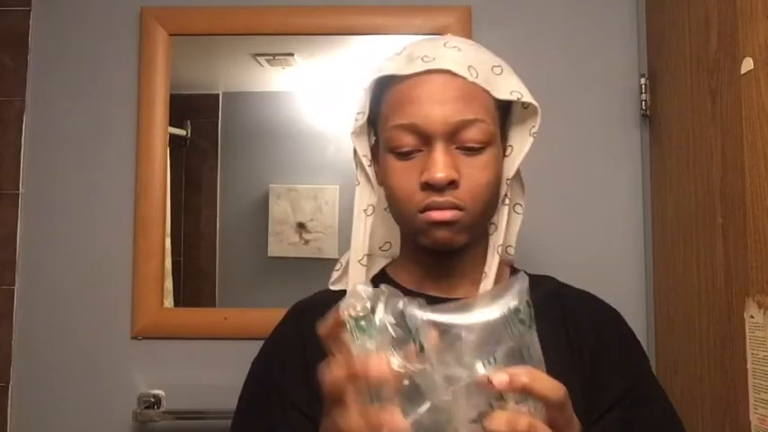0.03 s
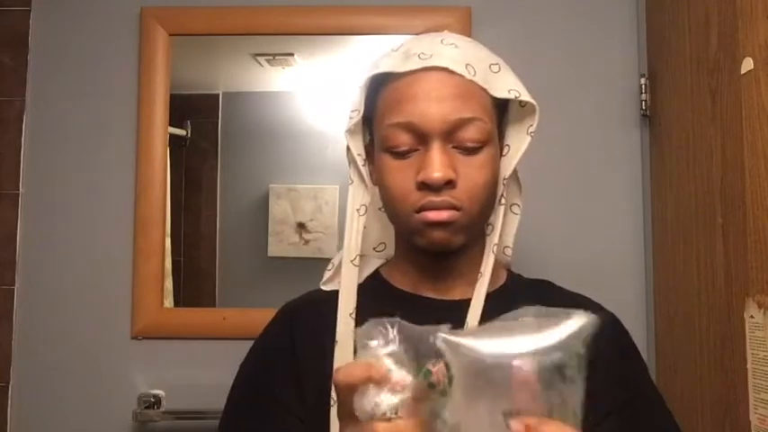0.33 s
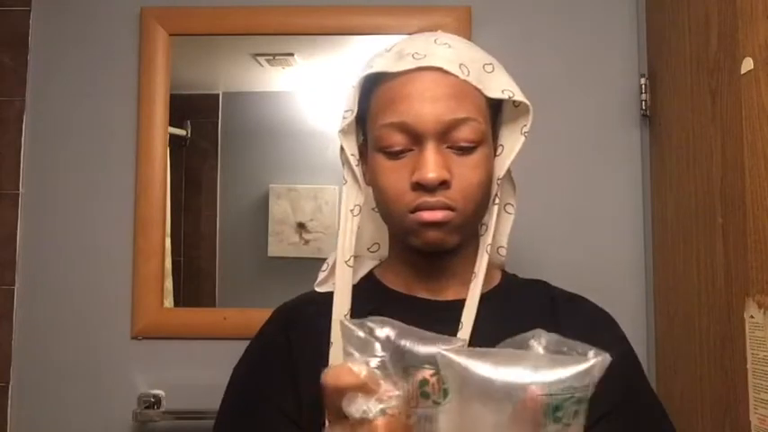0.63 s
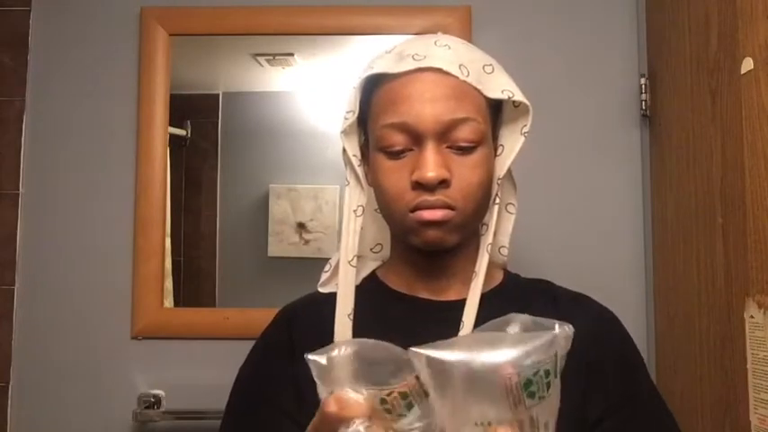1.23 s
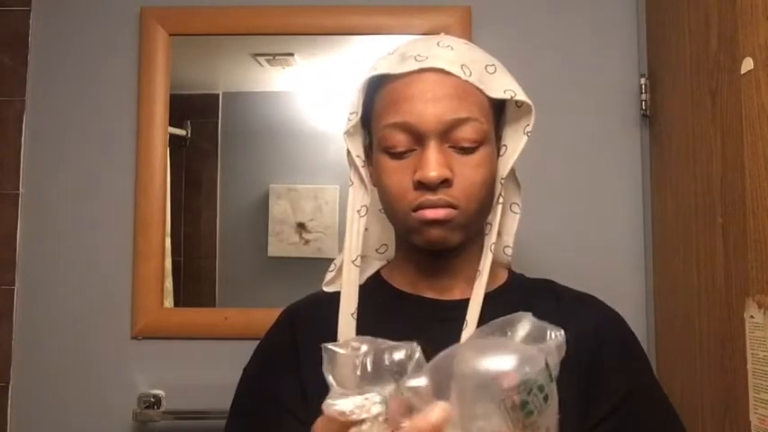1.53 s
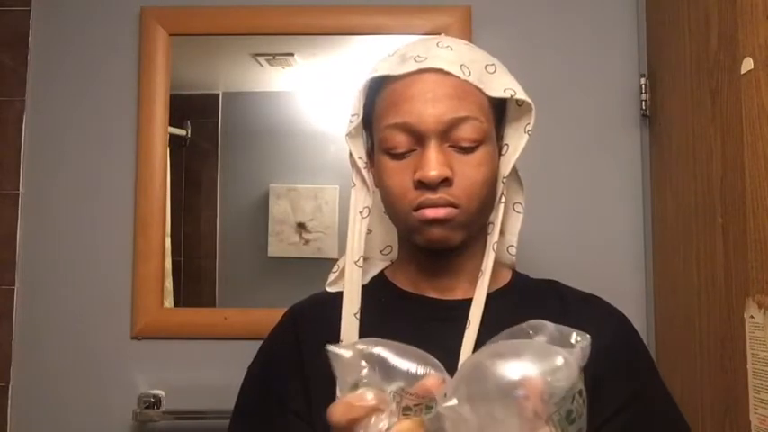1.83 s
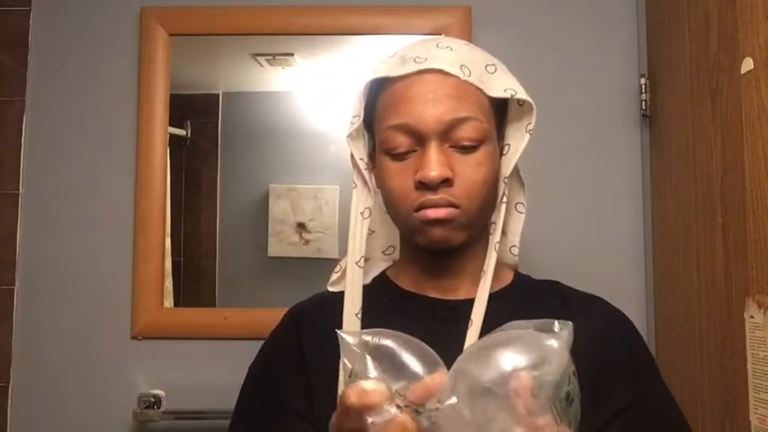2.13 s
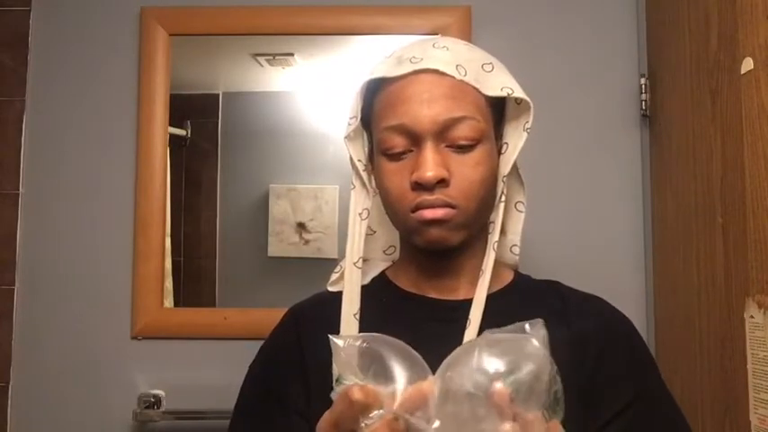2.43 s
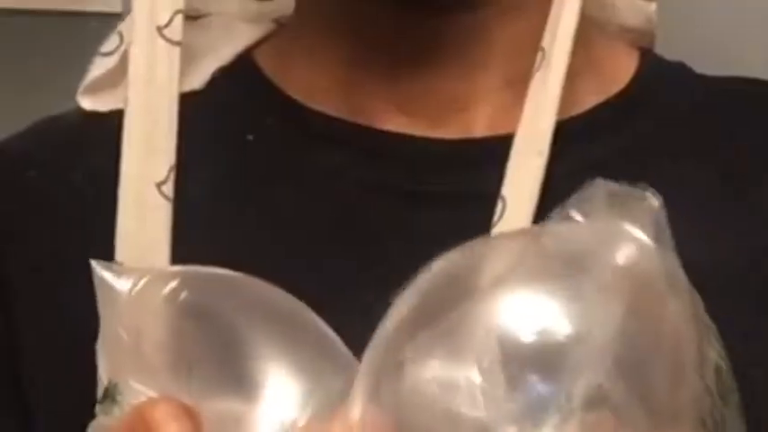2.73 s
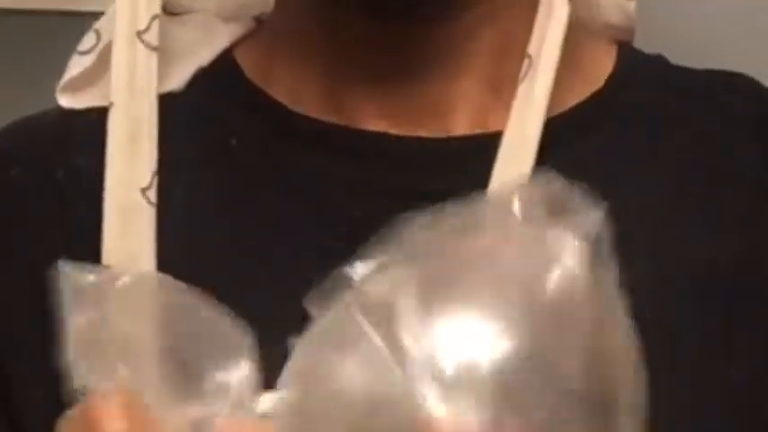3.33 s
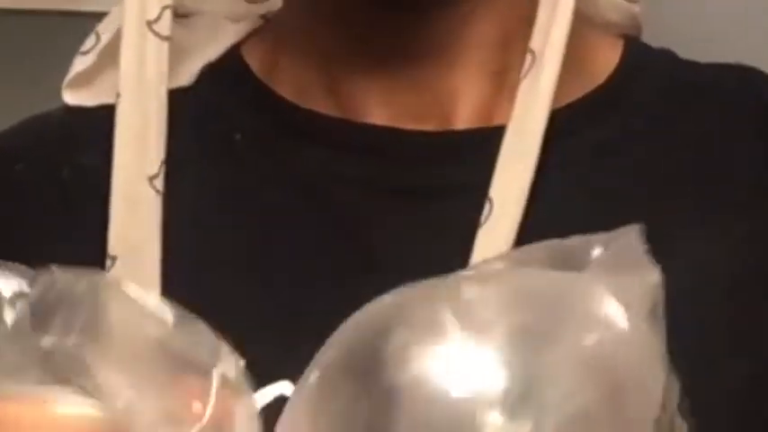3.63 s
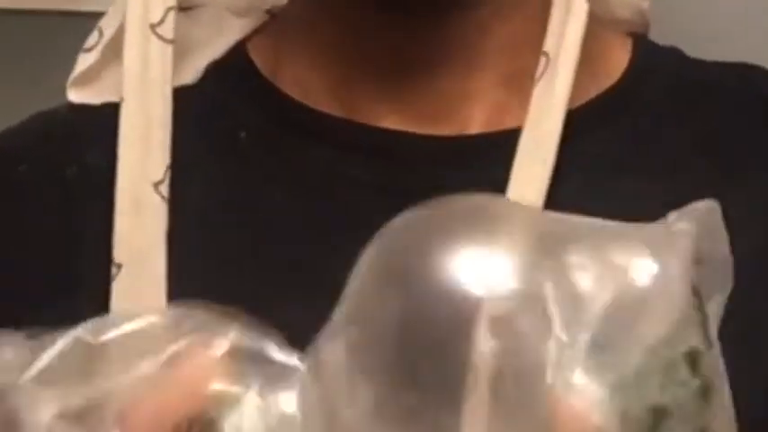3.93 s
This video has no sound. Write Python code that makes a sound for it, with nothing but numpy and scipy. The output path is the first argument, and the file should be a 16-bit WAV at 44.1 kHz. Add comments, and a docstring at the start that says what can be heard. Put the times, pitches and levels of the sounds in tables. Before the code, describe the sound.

Close up in a small, hard-walled bathroom, squeezed plastic air pillows rustle and give three hollow snaps. The crinkling softens, one pillow pops sharply and loudly, and a little light rustling follows.

```python
"""Air pillows in a bathroom

One microphone, close to two hands squeezing plastic air pillows in a small, hard-walled bathroom.
The film crinkles and creases; three times a taut wall buckles with a hollow snap. Then one pillow
tears and bursts, driving the recorder into its limiter, and the slack film rustles on."""
import sys
import numpy as np
from scipy import signal
from scipy.fft import rfft, irfft
from scipy.io import wavfile
from scipy.ndimage import uniform_filter1d, minimum_filter1d

SR = 44100
rng = np.random.default_rng(int(sys.argv[2]) if len(sys.argv) > 2 else 0)


def generate_wav(signal):
    """Clip the signal to [-1, 1] and save it as 16-bit WAV at the path in sys.argv[1]."""
    frames = np.transpose(np.atleast_2d(signal))
    scaled = np.clip(frames, -1, 1) * 32767
    pcm = np.round(scaled).astype(np.int16)
    wavfile.write(sys.argv[1], SR, pcm)


N = 176400

# Room tone at the microphone. Each row: frequency in Hz, relative level in dB.
ROOM_TONE_SPECTRUM = [(20, -8.5), (50, -11.5), (85, 2), (105, -4.5), (145, 0.5), (190, -33.5), (235, -7),
                      (400, -24.5), (1000, -18), (3000, -22), (8000, -30.5), (16000, -35.5)]
# Reverberation of the bathroom. Each row: frequency in Hz, seconds to fall 60 dB.
BATHROOM_T60 = [(100, 0.28), (300, 0.32), (700, 0.23), (1200, 0.2), (2500, 0.16), (6000, 0.18),
                (14000, 0.12)]
# Low room modes, rung by the burst. Each row: frequency in Hz, level in dB, seconds to fall 60 dB.
BATHROOM_MODES = [(86, -44, .7), (149.8, -38, .4), (240.4, -34.5, 0.64), (270.3, -29, 0.55)]
# The hands squeezing. Each row: time in seconds, relative levels of rustle and of crackle in dB.
SQUEEZE_LEVELS = [(0, -43.5, -46.5), (.06, -50.5, -51), (.115, -40.5, -41.5), (.16, -49.5, -53.5),
                  (.22, -34, -43.5), (.29, -37.5, -40), (.33, -37.5, -43.5), (.37, -49, -50.5),
                  (.52, -47.5, -50), (.62, -50.5, -51.5), (.70, -48, -52), (.77, -63, -56.5),
                  (.80, -47, -48), (.85, -54.5, -59.5), (.9, -49.5, -53), (.94, -46.5, -46.5),
                  (1.05, -47, -49.5), (1.24, -43, -47.5), (1.32, -36.5, -49), (1.39, -41, -45),
                  (1.44, -48.5, -54.5), (1.505, -55, -57), (1.539, -34.5, -37.5), (1.58, -38.5, -43.5),
                  (1.61, -44, -47), (1.675, -34.5, -40.5), (1.73, -33, -50), (1.80, -53, -52.5),
                  (1.88, -58, -60.5), (1.93, -54.5, -55.5), (2.0, -47, -48.5), (2.07, -52.5, -54),
                  (2.2, -54, -55.5), (2.3, -50, -52.5), (2.43, -55, -56), (2.52, -50.5, -52),
                  (2.56, -48.5, -56), (2.61, -51, -58), (2.64, -49, -51.5), (2.71, -53, -58.5),
                  (2.77, -55.5, -60.5), (2.87, -61, -63), (2.97, -59.5, -63.5), (3.05, -51.5, -56),
                  (3.12, -60, -67), (3.16, -52, -56.5), (3.25, -70.5, -78), (3.45, -66.5, -73.5),
                  (3.53, -51.5, -56), (3.58, -58, -57), (3.62, -53, -55.5), (3.659, -64, -63),
                  (3.75, -59.5, -64), (3.84, -57, -50), (3.92, -58, -57), (4, -57, -65)]
# Hollow rustle of the pillow. Each row: frequency in Hz, relative level in dB.
RUSTLE_SPECTRUM = [(100, -21.5), (200, -13), (300, -13), (550, -11), (820, -8.5), (1010, 2.5), (1250, -4),
                   (1700, -4), (2450, -7), (2650, -25), (5000, -34), (16000, -61)]
# Fine crackle of the film. Each row: frequency in Hz, relative level in dB.
CRACKLE_SPECTRUM = [(300, -39), (1000, -6), (2900, -6), (3300, 2.5), (4700, -1.5), (5700, -0.5),
                    (7500, -5.5), (9700, -9), (10300, -14.5), (11500, -11.5), (15800, -14)]
# Creases giving way. Each row: start in seconds, relative levels of rustle and of crackle in dB.
CREASE_EVENTS = [(.121, -39, -40.5), (.188, -29, -38), (0.2129, -25, -38), (.275, -26, -46),
                 (0.29, -41, -42), (.391, -29.5, -50), (0.5469, -25.5, -41.5), (.684, -31, -44),
                 (0.729, -35, -40), (.783, -42, -44), (0.8055, -28.5, -33.5), (.911, -27, -42),
                 (1.279, -29.5, -34), (1.314, -33, -42), (1.3431, -18.5, -44), (1.455, -32, -50),
                 (1.51, -34, -41.5), (1.54, -29, -37), (1.664, -24, -47), (1.904, -31.5, -50),
                 (1.953, -31, -38.5), (1.995, -39, -44), (2.043, -35.5, -48.5), (2.106, -33.5, -50),
                 (2.338, -35, -47), (2.536, -28, -37), (2.634, -42, -41.5), (2.752, -30.5, -43.5),
                 (2.822, -32.5, -54), (2.924, -41, -49.5), (3.01, -35.5, -45), (3.512, -28.5, -45)]
# Taut walls buckling, two rows to a snap. Each row: start in seconds, ring gain in dB, pitch in Hz,
# rise in seconds, click gain in dB, thud gain in dB.
BUCKLE_EVENTS = [(0.2421, -19.5, 1047, 0.0007, -13, -50), (0.2445, -9, 1030, 0.00029, -7, -31.5),
                 (1.3292, -20.5, 1116, 0.00042, -27, -61), (1.3397, -13.5, 1034, .0005, -12, -36.5),
                 (1.6795, -9.5, 1163, 0.0015, -33, -59.5), (1.6879, 5.5, 1035, 0.00033, 5.5, -31.5)]
# Ring of a taut pillow. Each row: ratio to its pitch, relative level in dB, seconds to fall 60 dB.
PILLOW_MODES = [(.66, -16, 0.041), (.97, -2.5, 0.031), (1.11, -7.5, 0.036), (1.27, -11, 0.026),
                (1.55, -16, 0.032), (2.2, -15, 0.019)]
# A tear running along the film. Each row: frequency in Hz, relative level in dB.
TEAR_SPECTRUM = [(100, -40), (500, -19.5), (1100, -1), (1800, 5), (2700, -1.5), (4000, -5.5), (5500, -30.5),
                 (9000, -46), (15000, -60.5)]
# The torn film cracking. Each row: start in seconds, gain in dB.
FILM_CRACKS = [(3.1971, -4), (3.2044, 8)]
# The air escaping at once. Each row: frequency in Hz, relative level in dB.
BLAST_SPECTRUM = [(30, -13), (120, -4.5), (195, -17.5), (270, 1), (370, 0.5), (560, -3), (800, -1),
                  (1100, 6), (1500, 1.5), (1900, -5), (2400, -5.5), (2900, -11), (4000, -11.5), (6500, -19),
                  (9000, -33), (10300, -44), (12000, -29.5), (15800, -41.5)]


def amp(db):
    """Decibels to gain."""
    return 10 ** (np.asarray(db) / 20)


def unit_rms(x):
    """Scales to an rms of one."""
    return x / np.sqrt(np.mean(x ** 2) + 1e-20)


def value_at(table, hz):
    """Reads a table along a log-frequency axis."""
    table_hz, values = np.transpose(table)
    return np.interp(np.log(hz + 1), np.log(table_hz + 1), values)


def add(mix, start_s, sound):
    """Adds a sound into the mix at its start time."""
    part = mix[round(start_s * SR):][:len(sound)]
    part += sound[:len(part)]


def colour(x, spectrum, size=4096):
    """Applies a minimum-phase filter of unit energy with the given spectrum."""
    hz = abs(np.fft.fftfreq(size, 1 / SR))
    log_gain = np.log(amp(value_at(spectrum, hz)))
    response = np.exp(np.conj(signal.hilbert(log_gain)))
    taps = np.fft.ifft(response).real[:size // 2]
    return signal.oaconvolve(x, taps / np.linalg.norm(taps))[:len(x)]


def ring(modes, t, pitch=1):
    """Struck modes: a sum of dying sines."""
    return sum(amp(db - 60 * t / t60) * np.sin(2 * np.pi * f * pitch * t) for f, db, t60 in modes)


def ticks(per_s, spread_db):
    """Random clicks, most small and a few large."""
    sizes = amp(spread_db * np.minimum(rng.exponential(1, N), 5))
    signs = rng.choice([-1., 1.], N)
    return unit_rms(sizes * signs * (rng.random(N) < per_s / SR))


def crack(fade_s):
    """A very short puff of noise of unit energy."""
    t = np.arange(SR // 20) / SR
    puff = rng.standard_normal(len(t)) * np.exp(-t / fade_s)
    return puff / np.linalg.norm(puff)


def room_tone(hum_hz=85):
    """The bathroom's own low noise, with a faint hum."""
    noise = colour(rng.standard_normal(N), ROOM_TONE_SPECTRUM)
    hum = np.sqrt(2) * np.sin(2 * np.pi * hum_hz * np.arange(N) / SR)
    return amp(-59) * noise + amp(-66.5) * hum


def bathroom(direct, wet_db, first_echo_s=0.0033):
    """Direct sound at the microphone plus dense reflections off close walls, dying faster in the treble."""
    count = SR * 3 // 4
    echoes = rng.choice([-1., 1.], count) * (rng.random(count) < 0.1)
    hz, t, bands = signal.stft(echoes, SR, nperseg=256)
    decay = amp(-60 * t / value_at(BATHROOM_T60, hz)[:, None])
    spectrum = rfft(signal.istft(bands * decay, SR, nperseg=256)[1])
    local_power = uniform_filter1d(abs(spectrum) ** 2, 90)
    tail = irfft(spectrum / np.sqrt(local_power + 1e-12))[:count * 3 // 4]  # even energy in all bands
    tail *= np.clip(np.arange(len(tail)) / SR / first_echo_s - 1, 0, 1)
    return direct + amp(wet_db) * signal.fftconvolve(direct, tail / np.linalg.norm(tail))[:N]


def crease(fade_s=0.0049):
    """A crease gives way: one click, then a dying run of small slips."""
    t = np.arange(SR // 20) / SR
    slips = 0.52 * rng.standard_normal(len(t)) * (rng.random(len(t)) < 0.1) * np.exp(-t / fade_s)
    slips[0] = 1
    return slips / np.linalg.norm(slips)


def crinkling_film(clump_s=0.012):
    """Wrinkles click in clumps and creases give way; the film crackles and the hollow pillow rustles."""
    t = np.arange(N) / SR
    times, rustle_db, crackle_db = np.transpose(SQUEEZE_LEVELS)
    clumps_db = 2 * unit_rms(uniform_filter1d(rng.standard_normal(N), round(clump_s * SR)))
    rustle = ticks(per_s=3500, spread_db=3) * amp(np.interp(t, times, rustle_db) - 1.5 + clumps_db / 2)
    crackle = ticks(per_s=1700, spread_db=3) * amp(np.interp(t, times, crackle_db) - 2 + clumps_db)
    for start_s, hollow_db, sharp_db in CREASE_EVENTS:
        slips = crease()
        add(rustle, start_s, amp(hollow_db + 14.5) * slips)
        add(crackle, start_s, amp(sharp_db + 20.5) * slips)
    return bathroom(colour(rustle, RUSTLE_SPECTRUM) + colour(crackle, CRACKLE_SPECTRUM), wet_db=-6.5)


def buckling_walls(thud_hz=123, thud_s=0.0055):
    """A pillow wall flips: a click, the short ring of the taut pillow and a low push of air."""
    t = np.arange(SR // 5) / SR
    thud = np.sin(2 * np.pi * thud_hz * t) * t / thud_s * np.exp(1 - t / thud_s)
    body, clicks = np.zeros(N), np.zeros(N)
    for start_s, ring_db, pitch_hz, rise_s, click_db, thud_db in BUCKLE_EVENTS:
        attack = 1 - np.exp(-(t / rise_s) ** 2)
        add(body, start_s, amp(ring_db) * ring(PILLOW_MODES, t, pitch_hz) * attack + amp(thud_db) * thud)
        add(clicks, start_s, amp(click_db) * crack(fade_s=0.0025))
    return bathroom(body + colour(clicks, CRACKLE_SPECTRUM), wet_db=-8.5)


def bursting_pillow(tear_s=3.173, burst_s=3.197, swell_db=39, blast_fade_s=0.016):
    """A tear swells until the pillow cracks open; the blast fills the room and rings its low modes."""
    t = np.arange(N) / SR
    swell = amp(swell_db * np.minimum(t - burst_s, 0) / (burst_s - tear_s))
    tearing = (t > tear_s) & (t < burst_s)
    tear = colour(ticks(per_s=5000, spread_db=2) * swell * tearing, TEAR_SPECTRUM)
    cracks = np.zeros(N)
    for start_s, db in FILM_CRACKS:
        add(cracks, start_s, amp(db) * crack(fade_s=0.0006))
    age = np.maximum(t - burst_s, 0)
    escaping_air = rng.standard_normal(N) * (t >= burst_s) * np.exp(-age / blast_fade_s)
    torn_film = bathroom(tear + colour(cracks, CRACKLE_SPECTRUM), wet_db=-6)
    blast = bathroom(colour(escaping_air, BLAST_SPECTRUM), wet_db=-2)
    return torn_film + amp(-2.5) * blast + ring(BATHROOM_MODES, age)


def scene():
    """The pillows and the room tone at one microphone."""
    return (crinkling_film() + buckling_walls() + bursting_pillow() + room_tone())[None]


def record(dry, hold_s=0.0028, cutoff_hz=15850):
    """The recorder: a fast limiter holds the peaks to full scale, then a low-pass cuts the top treble."""
    hold = round(hold_s * SR)
    needed_gain = np.minimum(1, 1 / (abs(dry[0]) + 1e-9))
    gain = uniform_filter1d(minimum_filter1d(needed_gain, hold), hold)
    lowpass = signal.firwin(511, cutoff_hz, window=("kaiser", 9), fs=SR)
    return signal.oaconvolve(dry * gain, lowpass[None], "same")


dry = scene()
out = record(dry)
generate_wav(out)
```